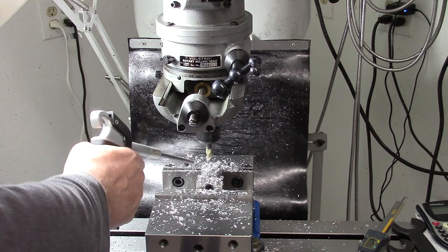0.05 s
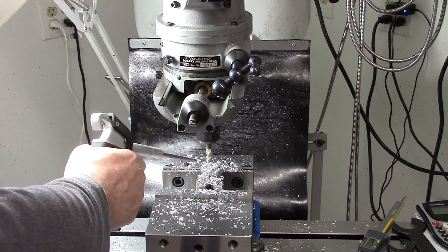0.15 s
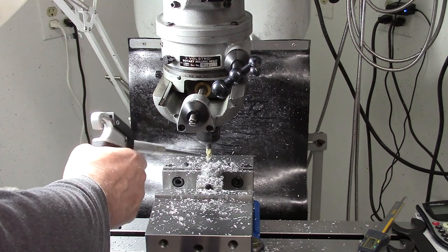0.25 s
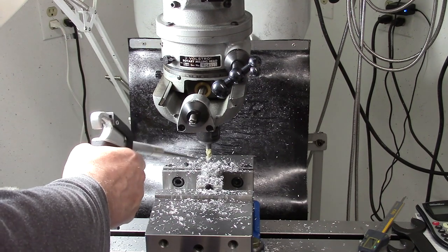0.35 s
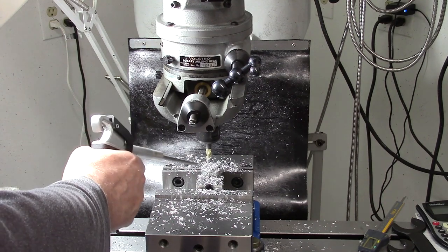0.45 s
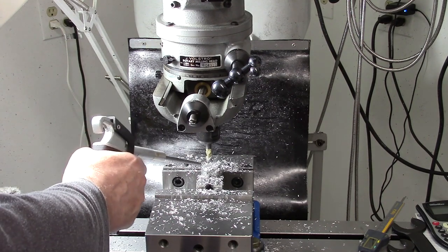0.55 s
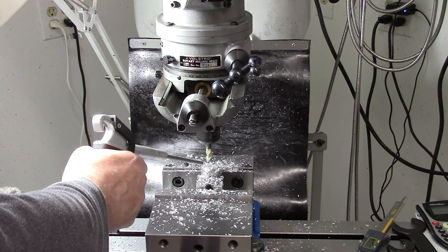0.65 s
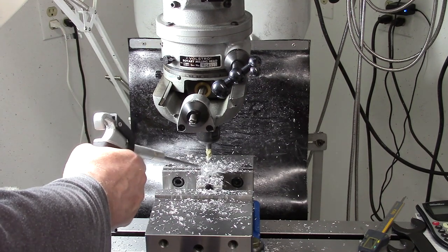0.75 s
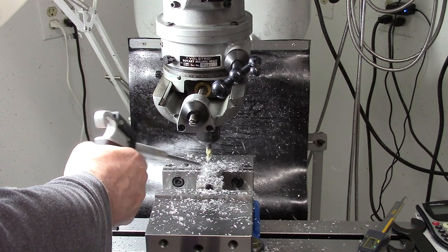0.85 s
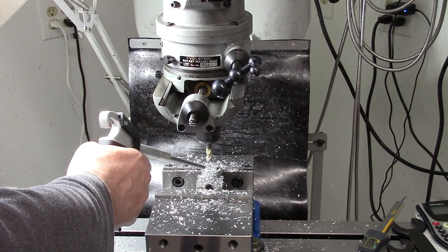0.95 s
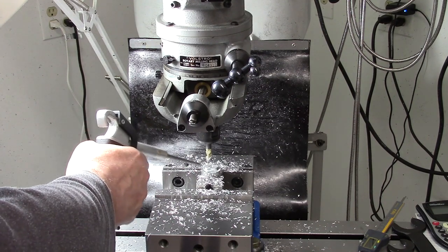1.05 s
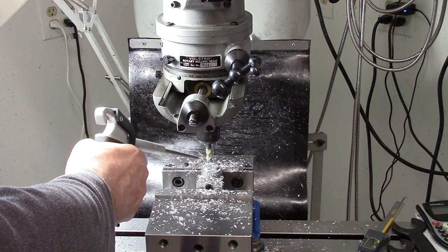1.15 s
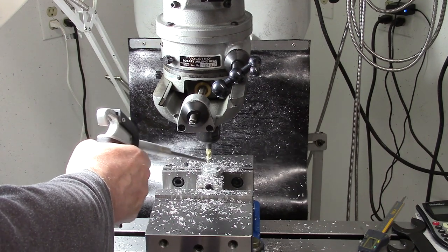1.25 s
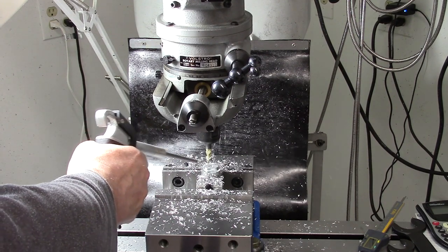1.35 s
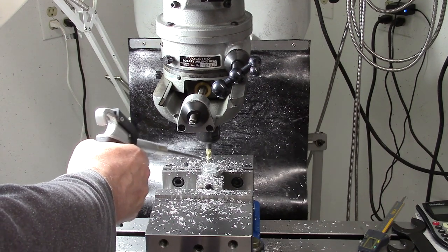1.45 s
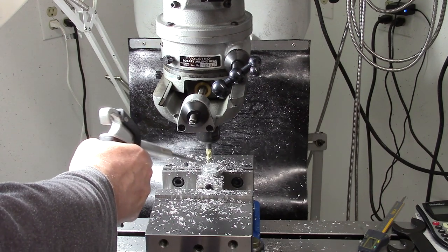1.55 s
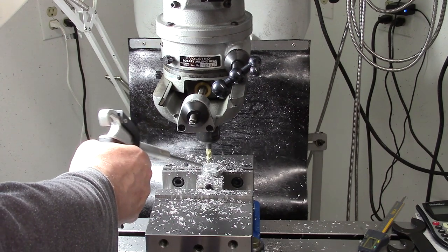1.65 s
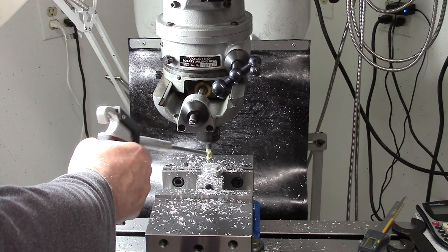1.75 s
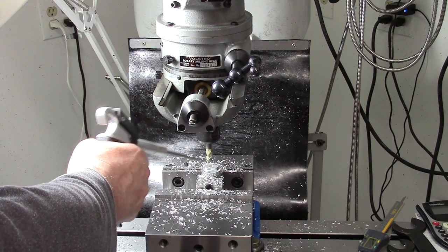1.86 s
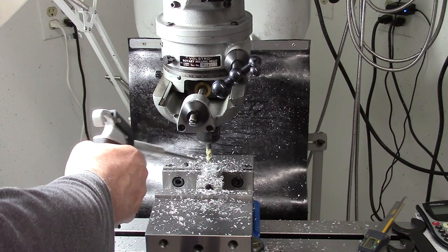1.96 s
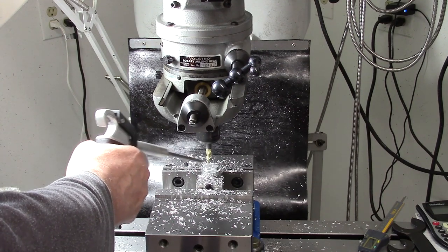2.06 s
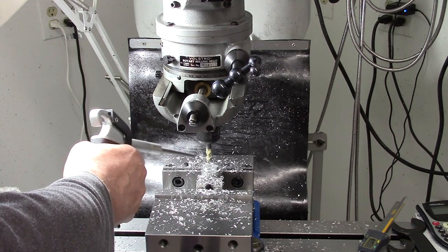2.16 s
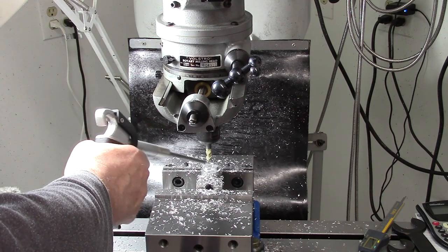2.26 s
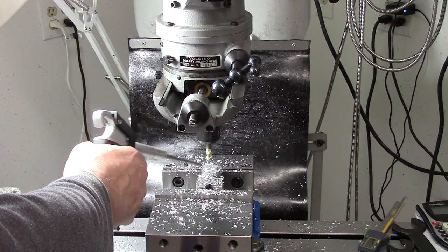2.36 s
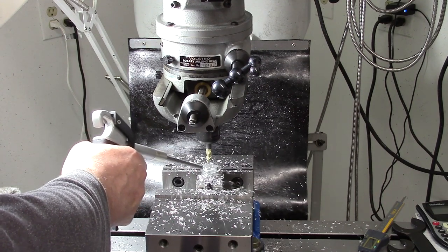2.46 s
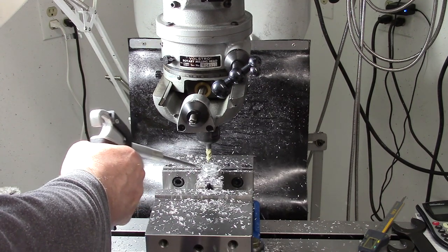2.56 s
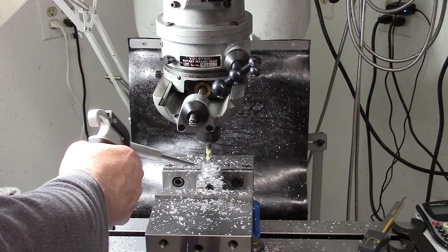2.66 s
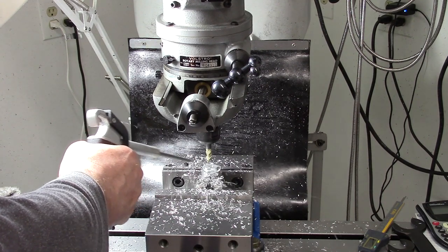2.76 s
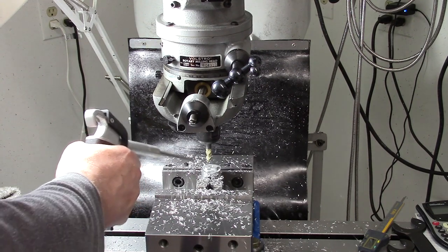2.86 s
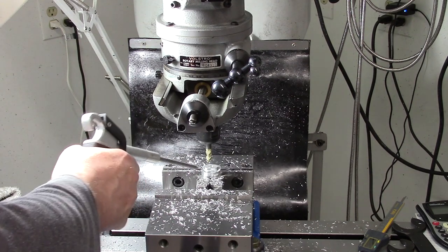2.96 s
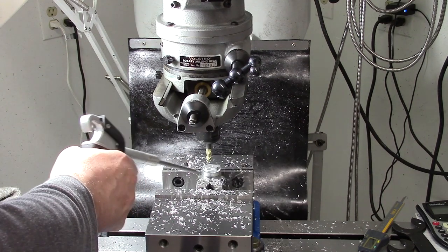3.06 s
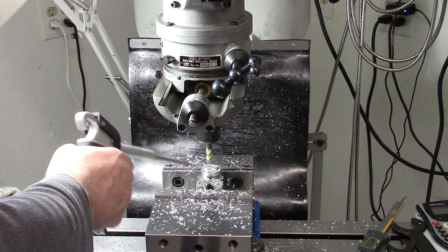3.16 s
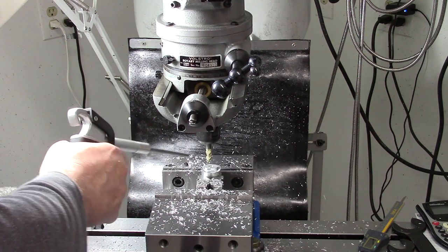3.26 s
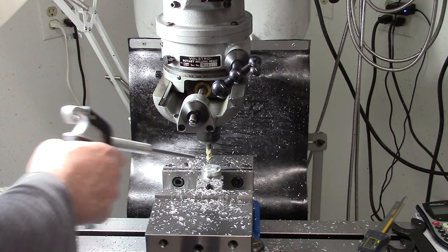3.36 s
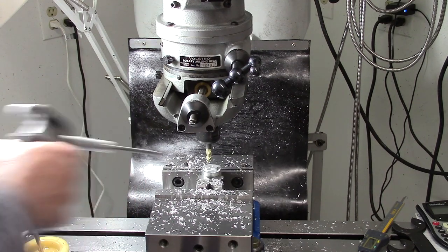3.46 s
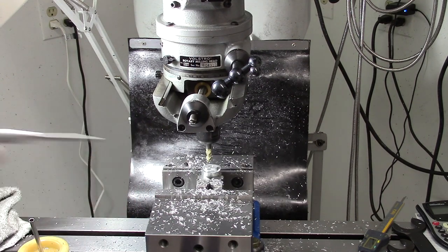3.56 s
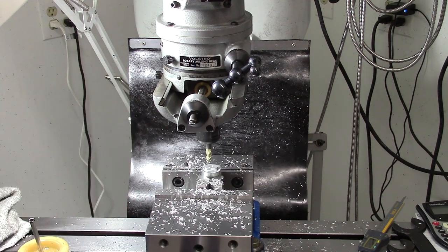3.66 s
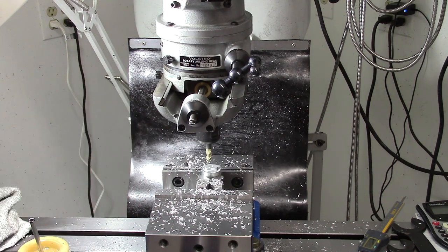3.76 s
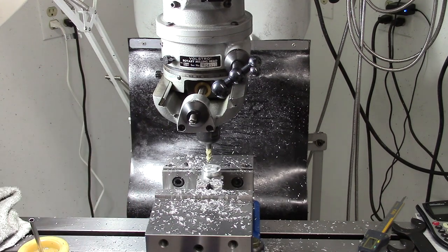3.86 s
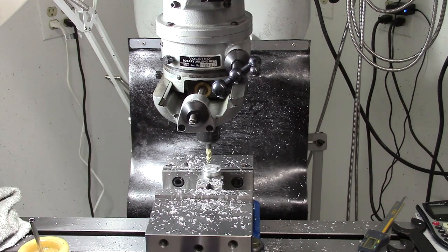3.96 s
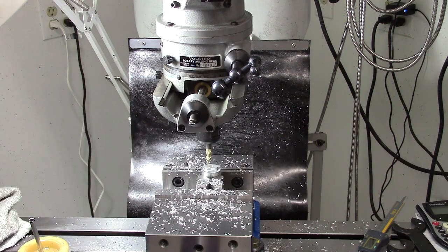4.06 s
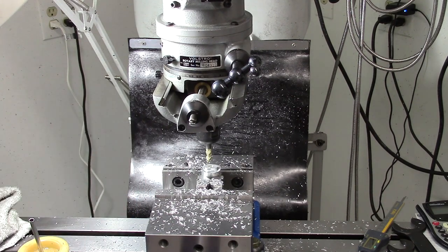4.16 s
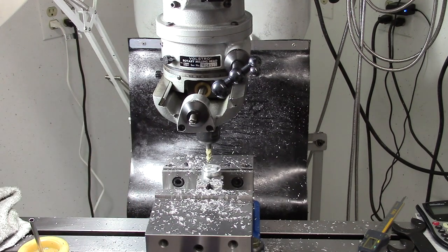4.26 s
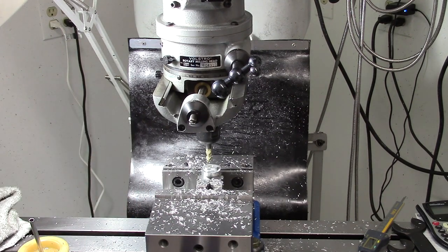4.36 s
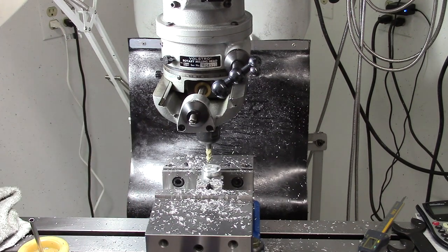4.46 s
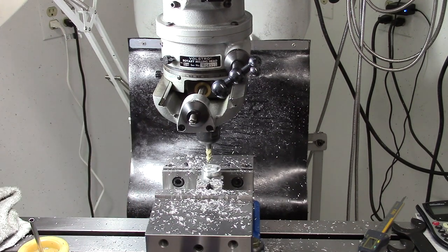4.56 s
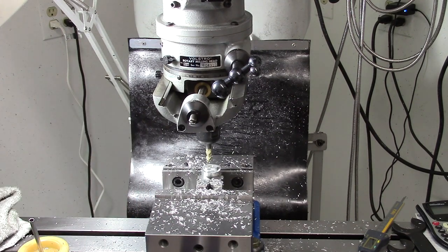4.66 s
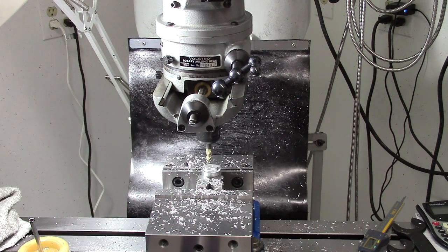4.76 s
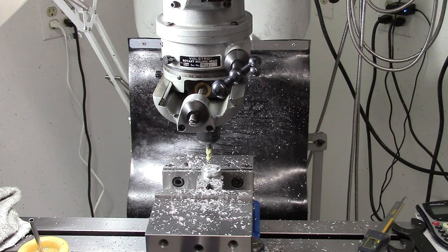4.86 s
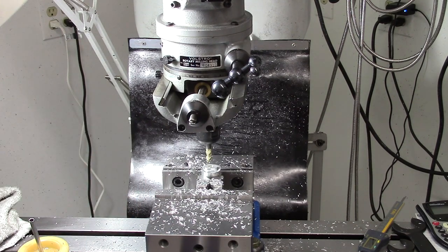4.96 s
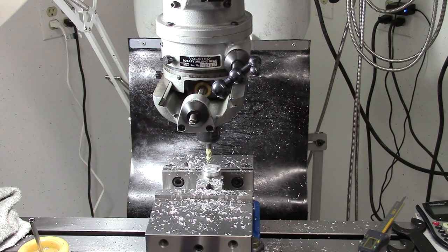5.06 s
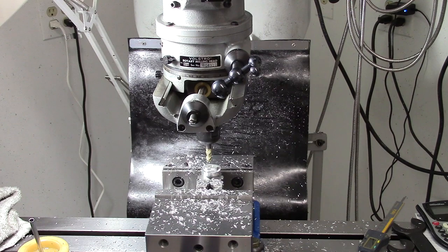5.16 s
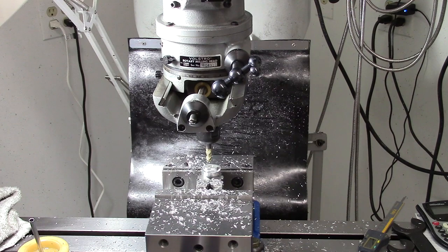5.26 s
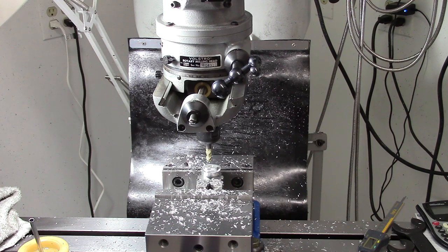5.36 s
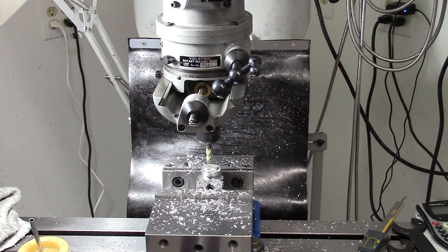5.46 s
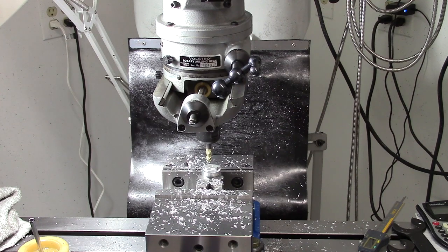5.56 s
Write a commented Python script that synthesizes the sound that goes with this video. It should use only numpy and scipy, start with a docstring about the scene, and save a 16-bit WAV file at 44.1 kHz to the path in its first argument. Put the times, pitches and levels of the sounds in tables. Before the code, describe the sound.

A compressed-air blow gun gives a short puff, then a long harsh hissing blast, before sheet metal clatters loudly in a humming workshop.

```python
"""Compressed-air jet in a machine shop

A blow gun clears chips from a part in a mill vise: one short puff, then a long blast.
Turbulent air, modelled as filtered noise, hisses in the gun's tube, flares on edges and roars in hollows.
The gun is withdrawn with a few ticks; then blows on sheet metal excite decaying modes, thuds and rattle.
Steady tones and broadband noise form the hum of the shop."""
import sys
import numpy as np
from scipy import signal
from scipy.fft import rfft, irfft, next_fast_len
from scipy.io import wavfile
from scipy.ndimage import uniform_filter1d, minimum_filter1d, map_coordinates

SR = 44100
rng = np.random.default_rng(int(sys.argv[2]) if len(sys.argv) > 2 else 0)


def wrap_up_sound(samples):
    """Save the sound to the file named by the first command line argument, as 16-bit audio."""
    columns = np.atleast_2d(samples).T
    # keep every value between -1 and 1, then stretch to whole-number steps
    tamed = np.clip(columns, -1, 1)
    steps = np.round(tamed * 32767).astype(np.int16)
    wavfile.write(sys.argv[1], SR, steps)


N = 247886  # length in samples


def amp(db):
    """Decibel law: the amplitude ratio of a level."""
    return 10 ** (np.asarray(db) / 20)


def unit(x):
    """Normalization: x scaled to an rms of 1."""
    return x / np.sqrt(np.mean(x ** 2) + 1e-20)


def along(points, hz):
    """Logarithmic interpolation: (f/Hz, value) points joined on a log-frequency axis."""
    f, values = np.transpose(points)
    return np.interp(np.log(hz + 1), np.log(f + 1), values)


def wobble(rate):
    """Slow random modulation: a smooth curve through random knots, rate of them a second."""
    knots = rng.standard_normal(int(N * rate / SR) + 4)
    return map_coordinates(knots, [np.arange(N) * rate / SR])


def gate(start, end, rise_db_per_s, fall_db_per_s):
    """Exponential onset and decay: a gain of 1 from start to end, with steady dB slopes outside."""
    t = np.arange(N) / SR
    early, late = np.maximum(start - t, 0), np.maximum(t - end, 0)
    return amp(-rise_db_per_s * early - fall_db_per_s * late)


def swell(s, db, half):
    """Gaussian envelope: a gain that peaks at time s, with standard deviation half."""
    return amp(db) * np.exp(-.5 * ((np.arange(N) / SR - s) / half) ** 2)


def filtered(x, response):
    """Linear filtering: the spectrum of x times a response of frequency."""
    padded = next_fast_len(N + SR // 2)
    spectrum = rfft(x, padded) * response(np.fft.rfftfreq(padded, 1 / SR))
    return irfft(spectrum, padded)[..., :N]


def noise(response):
    """Broadband source: white noise shaped by a response and set to rms 1."""
    return unit(filtered(rng.standard_normal(N), response))


def coloured(points):
    """Spectral shaping: noise of rms 1 with a (f/Hz, level/dB) spectrum."""
    return noise(lambda hz: amp(along(points, hz)))


def resonance(hz, centre, width):
    """Damped harmonic oscillator: the response of one resonance, with a peak of 1."""
    return 1j * hz * width / (centre ** 2 - hz ** 2 + 1j * hz * width)


def band(centre, width):
    """Cascaded resonance: noise of rms 1 through the same oscillator twice."""
    return noise(lambda hz: resonance(hz, centre, width) ** 2)


def resonant(peaks):
    """Energy summation: noise of rms 1 through steep resonances whose powers add."""
    def response(hz):
        # squared resonances, 2.05 nominal widths wide at -6 dB
        return np.sqrt(sum(amp(db) ** 2 * np.abs(resonance(hz, centre, 2.05 * width)) ** 4
                           for centre, width, db in peaks))
    return noise(response)


def ringing(modes):
    """Modal superposition: one second of decaying modes, their phases wandering with loose contact."""
    t = np.arange(SR) / SR
    ring = np.zeros(SR)
    for hz, db, t60 in modes:
        wander = rng.random() + np.cumsum(rng.standard_normal(SR)) / np.sqrt(SR)  # in cycles
        fresh_db = db + rng.normal(0, 1)
        ring += amp(fresh_db - 60 * t / t60) * np.sin(2 * np.pi * (hz * t + wander))
    return ring * (1 - np.exp(-t / .003))


# Reverberation of the room before stretching: f/Hz, t60/s
ROOM_DECAY = [(100, 0.94), (300, 0.64), (1000, 0.7), (2500, 0.6), (6000, 0.49), (14000, 0.2)]


def dying(x, stretch):
    """Frequency-dependent decay: the first second of x fades at stretch times the room's t60."""
    hz, t, z = signal.stft(x[:SR], SR, nperseg=256)
    t60 = stretch * along(ROOM_DECAY, hz)[:, None]
    return signal.istft(z * amp(-60 * t / t60), SR, nperseg=256)[1][:SR]


def bursts(times, levels, colour, stretch, attack):
    """Impulsive excitation: a fresh burst of dying coloured noise at each time; attack in s."""
    out, source = np.zeros(N + SR), coloured(colour)
    rise = 1 - np.exp(-np.arange(SR) / SR / attack)
    for s, db in zip(times, levels):
        fresh = np.roll(source, rng.integers(N))
        out[round(s * SR):][:SR] += amp(db) * rise * dying(fresh, stretch)
    return out[:N]


def diffuse(x):
    """Diffuse field: loudness and colour are kept, but phase is scrambled and sound 256 samples late."""
    z = signal.stft(x, nperseg=512)[2]
    scrambled = signal.istft(z * np.exp(2j * np.pi * rng.random(z.shape)), nperseg=512)[1]
    late = np.pad(scrambled, (256, 0))[:N]
    return np.std(x) * unit(late)


# Tones of the hum: f/Hz, mean level/dB
HUM_TONES = [(120, -76.5), (301.5, -53.5), (328.4, -64.5), (360.7, -59), (452, -59)]
# Relative spectrum of the steady machinery: f/Hz, level/dB (per Hz)
MACHINERY_SPECTRUM = [(15, -82.5), (25, -63), (86, -18), (148, -12.5), (267, -5.5), (359, -4.5),
                      (389, -8.5), (457, -8.5), (631, -12), (804, -11), (1530, -14.5), (1800, -18.5),
                      (2120, -23.5), (2360, -22.5), (15500, -47.5)]


def machinery():
    """Tonal and broadband radiation: a fan's rush and its slightly unsteady hum."""
    t = np.arange(N) / SR
    hum = np.zeros(N)
    for hz, db in HUM_TONES:
        level = amp(db + 1.3 * wobble(2.8))
        hum += level * np.sqrt(2) * np.sin(2 * np.pi * hz * t + 1.16 * wobble(6))
    return hum + amp(-45.5) * coloured(MACHINERY_SPECTRUM)


# Light ticks of gun and hose: t/s, level/dB
TICK_EVENTS = [(.063, -50.5), (3.673, -38), (3.71, -51), (3.821, -47), (3.897, -46.5), (3.985, -54.5),
               (5.188, -43.5)]
# Relative spectrum of a tick: f/Hz, level/dB (per Hz)
TICK_SPECTRUM = [(150, -45), (800, -20), (2000, -27), (3800, 10.5), (5000, -4), (6500, 4.5), (9000, -5),
                 (15000, -24.5)]
# Soft bumps of gun and hose: t/s, level/dB
BUMP_EVENTS = [(.063, -43.5), (3.673, -40), (3.935, -39), (5.188, -41)]
# Relative spectrum of a bump: f/Hz, level/dB (per Hz)
BUMP_SPECTRUM = [(40, -35), (130, -6), (205, 7), (320, 12.5), (600, -32), (1500, -55)]
# Brushes of the sleeve as the arm withdraws: t/s, level/dB, standard deviation/s
SLEEVE_BRUSHES = [(3.706, -47.5, 0.064), (3.93, -49, 0.099), (4.3, -52, .13)]
# Relative spectrum of rubbing cloth: f/Hz, level/dB (per Hz)
CLOTH_SPECTRUM = [(60, -41), (300, -13.5), (800, 2.5), (1800, 4.5), (4000, -4.5), (8000, -13.5),
                  (15000, -23)]


def handling():
    """Contact and friction noise: gun and hose tick and bump as they are moved; a sleeve rustles."""
    ticks = bursts(*np.transpose(TICK_EVENTS), TICK_SPECTRUM, stretch=0.39, attack=0.00093)
    bumps = bursts(*np.transpose(BUMP_EVENTS), BUMP_SPECTRUM, stretch=0.46, attack=0.0049)
    strokes = sum(swell(s, db, half) for s, db, half in SLEEVE_BRUSHES)
    rustle = strokes * amp(1.4 * wobble(30)) * coloured(CLOTH_SPECTRUM)
    return ticks + bumps + rustle


# Blows on the sheet metal: t/s, level/dB, hardness (0-1)
SHEET_BLOWS = [(4.757, -9.5, .05), (4.79, -16.5, 0), (4.822, -20, .05), (4.879, -12.5, .95),
               (4.891, -10.5, .95), (4.93, -20, .9), (4.975, -18, .8), (5.024, -15.5, 0.5),
               (5.05, -25.5, .1), (5.343, -41.5, 0.1), (5.378, -47, 0)]
# Modes of the sheet metal: f/Hz, mean level/dB, t60/s
SHEET_MODES = [(285, -13, .4), (502, -3, .4), (548, -6, .4), (704, -4, .45), (824, -5, .4), (921, -5, .4),
               (974, 0, .33), (1190, -12, .35), (2191, -11, .3), (3280, -17, .35)]
# Modes of a loose part, struck once: f/Hz, mean level/dB, t60/s
LOOSE_PART_MODES = [(2095, -13.5, 0.46), (2027, -3, 0.42), (2330, 3, 0.35), (2434, -7.5, 0.6),
                    (2280, -1.5, 0.66), (3260, -5, 0.2)]
# Relative spectrum of the dense rattle: f/Hz, level/dB (per Hz)
RATTLE_SPECTRUM = [(100, -48), (250, -19.5), (480, 0), (950, 1), (1300, -4), (2200, -7.5), (3200, -11.5),
                   (4500, -15.5), (7000, -23.5), (12000, -57.5)]
# Relative spectrum of the clash: f/Hz, level/dB (per Hz)
CLASH_SPECTRUM = [(100, -49), (600, -20), (1500, 5.5), (3000, 1.5), (5500, -0.5), (8000, -4.5),
                  (12000, -13), (15700, -22)]
# Relative spectrum of the thud: f/Hz, level/dB (per Hz)
THUD_SPECTRUM = [(25, -43.5), (70, -22.5), (140, -8.5), (220, -3.5), (300, 8), (370, 3.5), (550, -13),
                 (1200, -56)]
# How ringing follows hardness: level when soft/dB, gain when hard/dB
RING_BY_HARDNESS = (0, -15)
# How the clash follows hardness: level when soft/dB, gain when hard/dB
CLASH_BY_HARDNESS = (-23, 21)
# How the thud follows hardness: level when soft/dB, gain when hard/dB
THUD_BY_HARDNESS = (-22.5, 12)
THUD_GROWTH = 0.38  # dB of thud per dB of blow: weak blows are mostly thud
CLINK_S, CLINK_DB = 5.026, -26  # when and how hard the loose part is struck


def clatter():
    """Impact excitation: blows ring, thud and rattle the sheet; hard ones clash more and ring less."""
    s, blow_db, hardness = np.transpose(SHEET_BLOWS)

    def share_db(law):
        return law[0] + law[1] * hardness

    ring = np.zeros(N + SR)
    for start, level in zip(s, blow_db + share_db(RING_BY_HARDNESS)):
        ring[round(start * SR):][:SR] += amp(level) * ringing(SHEET_MODES)
    ring[round(CLINK_S * SR):][:SR] += amp(CLINK_DB) * ringing(LOOSE_PART_MODES)
    clash_db = blow_db + share_db(CLASH_BY_HARDNESS)
    thud_db = THUD_GROWTH * blow_db + share_db(THUD_BY_HARDNESS)
    rattle = bursts(s, blow_db, RATTLE_SPECTRUM, stretch=0.95, attack=0.0012)
    clash = bursts(s, clash_db, CLASH_SPECTRUM, stretch=0.69, attack=0.0027)
    thuds = bursts(s, thud_db, THUD_SPECTRUM, stretch=0.61, attack=0.0052)
    return ring[:N] + (rattle + clash) * amp(1.2 * wobble(200)) + thuds


# The trigger passes half-open: t/s, level/dB, rise/(dB/s), fall/(dB/s)
TRIGGER_SQUEEZES = [(.248, -18.5, 338.5, 399.5), (.56, -16.5, 157.5, 258)]
# Resonances of the half-open valve: f/Hz, nominal width/Hz, relative level/dB
VALVE_RESONANCES = [(1990, 270, -7), (2820, 260, -3.5), (3563, 120, 4.5), (4200, 250, 2.5),
                    (6400, 310, -2.5), (7260, 130, -2), (8300, 86, -1), (8680, 54, 2.5), (10290, 390, -3.5),
                    (10320, 200, -9.5), (11500, 220, -12.5), (12850, 198.5, -10), (14300, 260, -16)]
SEEP_DB, SEEP_FADE_DB_PER_S = -48, 400  # the valve seeps between squeezes


def leak():
    """Constricted flow: air squeezes through the half-open valve with a hollow, whistly hiss."""
    puffs = sum(amp(db) * gate(s, s, rise, fall) for s, db, rise, fall in TRIGGER_SQUEEZES)
    first_s, last_s = TRIGGER_SQUEEZES[0][0], TRIGGER_SQUEEZES[-1][0]
    seep = amp(SEEP_DB) * gate(first_s, last_s, SEEP_FADE_DB_PER_S, SEEP_FADE_DB_PER_S)
    flow = np.hypot(puffs, seep)
    return flow * amp(1.7 * wobble(49)) * resonant(VALVE_RESONANCES)


# The jet catches an edge: t/s, level/dB, standard deviation/s, centre f/Hz
EDGE_FLARES = [(.637, -16.5, 0.021, 6540), (0.703, -16, 0.028, 6270), (0.875, -15, 0.012, 6500),
               (1.05, -25.5, 0.037, 6600), (1.32, -19, .016, 6000), (1.564, -17, 0.018, 6000),
               (1.67, -14.5, 0.018, 5400), (2.05, -16.5, 0.022, 6200), (2.333, -16.5, 0.011, 6960),
               (2.391, -8.5, 0.039, 6800), (2.453, -14, 0.052, 7000), (2.711, -11.5, .02, 6300),
               (2.884, -11.5, 0.02, 5360), (3.07, -20.5, .04, 5400), (3.166, -18.5, 0.021, 6500)]
# The jet blows across a hole: t/s, level/dB, standard deviation/s, centre f/Hz, width at -6 dB/Hz
HOLE_HOOTS = [(2.363, 2.5, 0.012, 5800, 1600), (3.084, -15, .045, 1800, 900)]
# Relative spectrum of the spray off the part: f/Hz, level/dB (per Hz)
SPRAY_SPECTRUM = [(100, -69), (900, -45), (2000, -13), (2800, -3.5), (3900, 3), (5200, -6.5), (6400, 3.5),
                  (7600, -3.5), (8400, 2.5), (9500, -8), (10300, -4), (13000, -11), (15700, -22)]
SHRIEK_WIDTH_HZ, FLARE_SPRAY_DB = 2900, 0.5  # width at -6 dB; spray relative to shriek


def flares():
    """Edge and cavity excitation: on a sharp edge the jet shrieks and sprays; across a hole it hoots."""
    spray = amp(FLARE_SPRAY_DB) * coloured(SPRAY_SPECTRUM)
    edges = sum(swell(s, db, half) * (band(centre, SHRIEK_WIDTH_HZ) + spray)
                for s, db, half, centre in EDGE_FLARES)
    holes = sum(swell(s, db, half) * band(centre, width)
                for s, db, half, centre, width in HOLE_HOOTS)
    return (edges + holes) * amp(wobble(140))


def chips(rate, size):
    """Random impulse process: chips in the jet make it spit, about rate surges a second."""
    strikes = (rng.random(N) < rate / SR) * rng.exponential(size=N)
    t = np.arange(SR // 100) / SR
    return size * signal.fftconvolve(strikes, amp(-60 * t / 0.0042))[:N]


# The hand's aim: t/s, nearness of nozzle to part (0-1), depth in the part's hollows (0-1)
HAND_AIM = [(.68, .2, 0.28), (.8, .02, 0.12), (1.01, 0.18, 0.26), (1.17, 0.09, 0.07), (1.48, 0.23, 0),
            (1.6, 0.48, 0), (1.8, 0.2, 0), (2.17, 0.63, 0.15), (2.3, 1, 0.16), (2.42, 0.9, 0.56),
            (2.53, 0.8, 0), (2.63, 0.86, 0.7), (2.76, .55, 0.3), (2.83, 0.42, 0.5), (2.95, .7, 0.36),
            (3.06, .55, 0.93), (3.25, 0.47, 0.4)]
# Resonances of the gun's tube: f/Hz, nominal width/Hz, relative level/dB
TUBE_RESONANCES = [(3030, 120, -9), (3390, 150, 1), (3570, 200, -3), (4230, 260, 0), (4650, 300, -10),
                   (5900, 120, -8), (6490, 220, 1), (7030, 180, -6), (8170, 180, -4), (8550, 280, -6),
                   (10150, 450, -10), (11950, 500, -16), (13000, 500, -19), (13980, 330, -13)]
# Relative spectrum of the roar: f/Hz, level/dB (per Hz)
ROAR_SPECTRUM = [(100, -67), (300, -41.5), (700, -23.5), (1050, -5), (1550, 0.5), (2300, 4), (2900, -2.5),
                 (4500, -20)]
# Relative spectrum of the rumble: f/Hz, level/dB (per Hz)
RUMBLE_SPECTRUM = [(25, -19.5), (120, -29.5), (220, -27.5), (330, -1), (480, 3.5), (700, 3.5), (980, 7),
                   (1500, -20), (3000, -60.5)]
# How the tube follows the aim: level when far/dB, gain when near/dB, gain in a hollow/dB
TUBE_BY_AIM = (-19, 7.5, -8.5)
# How the spray follows the aim: level when far/dB, gain when near/dB, gain in a hollow/dB
SPRAY_BY_AIM = (-24.5, 13.6, 0)
# How the roar follows the aim: level when far/dB, gain when near/dB, gain in a hollow/dB
ROAR_BY_AIM = (-31, 10.1, 5)
# How the rumble follows the aim: level when far/dB, gain when near/dB, gain in a hollow/dB
RUMBLE_BY_AIM = (-48.5, 12, 9.5)
# The trigger: fully open between these times; the flow swells and dies at steady rates
OPEN_S, CLOSE_S, OPEN_DB_PER_S, CLOSE_DB_PER_S = .61, 3.244, 138, 203.5


def jet():
    """Turbulent mixing noise: air rings the tube, sprays off the part and roars in its hollows."""
    s, *columns = np.transpose(HAND_AIM)
    near, deep = [np.interp(np.arange(N) / SR, s, column) for column in columns]

    def aimed(law):
        return amp(law[0] + law[1] * near + law[2] * deep)

    spray = aimed(SPRAY_BY_AIM) * coloured(SPRAY_SPECTRUM) * (1 + chips(rate=30, size=.5))
    hiss = aimed(TUBE_BY_AIM) * resonant(TUBE_RESONANCES) + spray
    roar = aimed(ROAR_BY_AIM) * coloured(ROAR_SPECTRUM)
    rumble = aimed(RUMBLE_BY_AIM) * coloured(RUMBLE_SPECTRUM)
    flutter_db = .5 * wobble(45) + 0.93 * wobble(220)  # the jet flaps about its aim
    flow = gate(OPEN_S, CLOSE_S, OPEN_DB_PER_S, CLOSE_DB_PER_S)
    return flow * (hiss * amp(flutter_db) + (roar + rumble) * amp(1.7 * wobble(60)))


def shop_echo(x, near_db, near_t60, far_db):
    """Reflection and reverberation: shifting quick echoes off the mill, then the tail of the room."""
    t = np.arange(SR) / SR
    paths = rng.standard_normal((6, SR)) * amp(-60 * t / near_t60)
    paths = paths / np.linalg.norm(paths, axis=1, keepdims=True)
    copies = signal.fftconvolve(x[None], paths, axes=1)[:, :N]
    shares = np.array([wobble(2.026) for _ in paths])  # these shift as the gun moves
    near = np.sum(copies * shares, axis=0) / np.linalg.norm(shares, axis=0)
    tail = dying(rng.standard_normal(SR), stretch=1)
    far = signal.fftconvolve(diffuse(x), tail / np.linalg.norm(tail))[:N]
    return np.std(x) * unit(x + amp(near_db) * near + amp(far_db) * far)


# Modes of the vise and tooling: f/Hz, mean level/dB, t60/s
STEEL_MODES = [(1916, -6, .6), (3400, -7, .45), (3752, -8, .5), (6400, -5, .65), (6475, -2, .7),
               (6550, -5, .65)]


def singing_steel(air, level_db):
    """Forced vibration: the jet keeps the steel faintly ringing, and the ring outlasts it."""
    ring = signal.fftconvolve(air, ringing(STEEL_MODES))[:N]
    return amp(level_db) * np.std(air) * unit(ring)


def ports(x, width):
    """Interaural-style decorrelation: reflections reach two close microphone ports a little differently."""
    side = filtered(diffuse(x), lambda hz: amp(along(width, hz)))
    return np.array([x + side, x - side])


# Difference between the ports for the jet: f/Hz, side level/dB
JET_SIDE = [(60, -46), (400, -23), (1100, -69), (3000, -45), (4500, -24.5), (6000, -18.5), (7000, -20),
            (8500, -31.5), (15000, -36.5)]
# Difference between the ports for the other sounds: f/Hz, side level/dB
ROOM_SIDE = [(60, -28.5), (300, -18.5), (1000, -25), (3000, -16.5), (6000, -13), (15000, -15)]


def scene():
    """Linear superposition: the echoing air and singing steel join the shop's other sounds."""
    air = shop_echo(leak() + jet() + flares(), near_db=-5, near_t60=0.1, far_db=-10)
    air = air + singing_steel(air, level_db=-23.5)
    aside = clatter() + handling() + machinery()
    lean_db = 0.22  # the other sounds lie slightly to the left
    return ports(air, JET_SIDE) + amp([[lean_db], [-lean_db]]) * ports(aside, ROOM_SIDE)


def limiter(x, ceiling_db, release_db_per_s):
    """Dynamic range limiting: a loud peak pulls the gain down at once; it then climbs back steadily."""
    over_db = np.maximum(20 * np.log10(np.abs(x).max(axis=0) + 1e-9) - ceiling_db, 0)
    climb_db = release_db_per_s * np.arange(N) / SR
    gain_db = climb_db - np.maximum.accumulate(over_db + climb_db)
    # the drop is widened, then smoothed, over 64 samples
    return x * amp(uniform_filter1d(minimum_filter1d(gain_db, size=64), size=64))


def record(dry):
    """Band limitation: peaks are limited and nothing above the cutoff is kept."""
    held = limiter(dry, ceiling_db=-.3, release_db_per_s=75)
    return filtered(held, lambda hz: hz < 15850)


dry = scene()
out = record(dry)
wrap_up_sound(out)
```